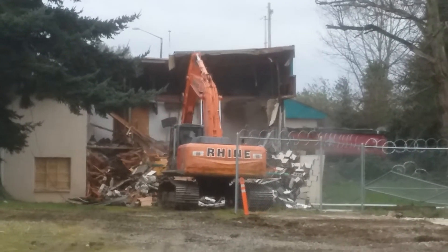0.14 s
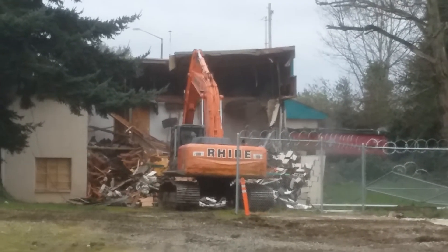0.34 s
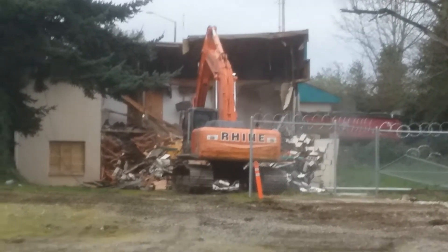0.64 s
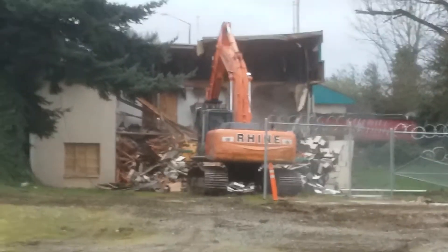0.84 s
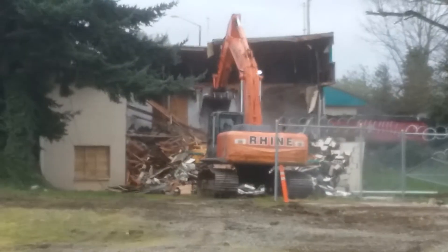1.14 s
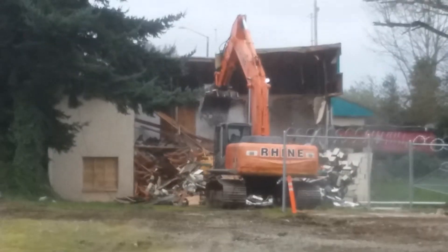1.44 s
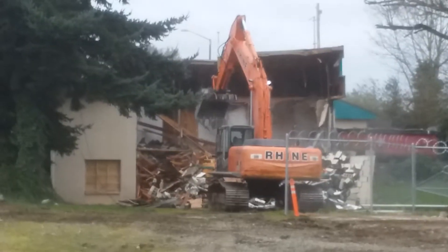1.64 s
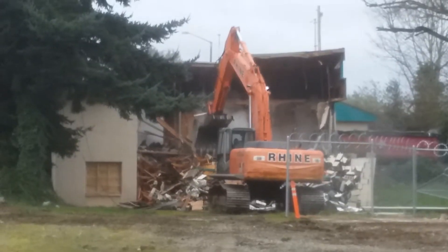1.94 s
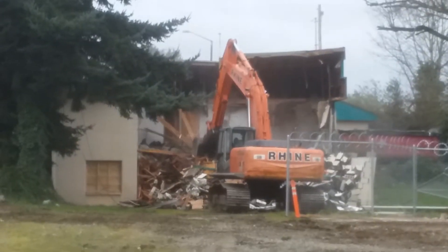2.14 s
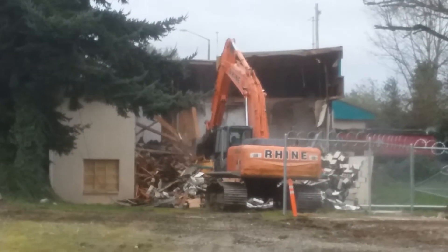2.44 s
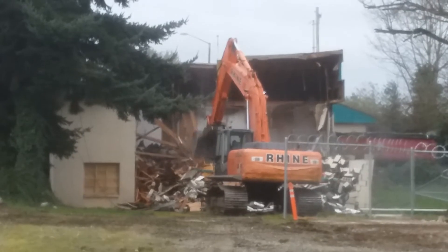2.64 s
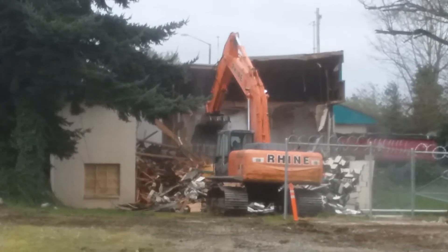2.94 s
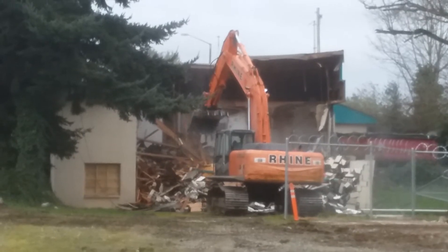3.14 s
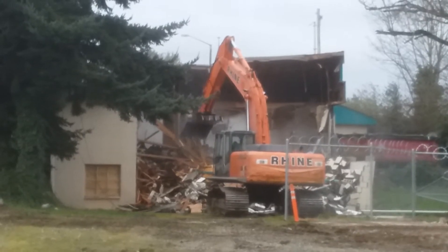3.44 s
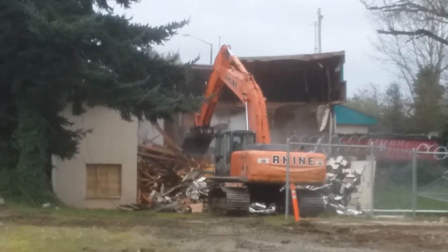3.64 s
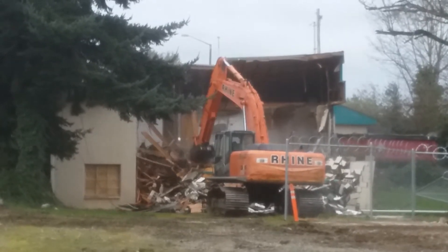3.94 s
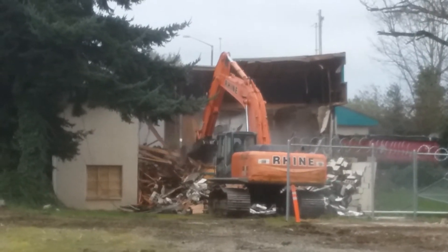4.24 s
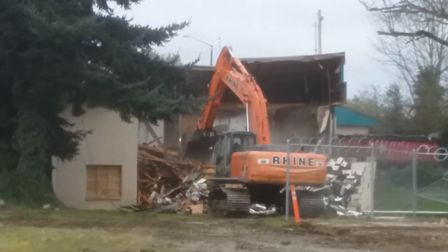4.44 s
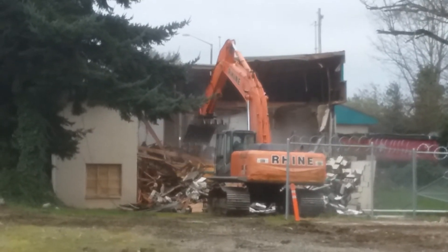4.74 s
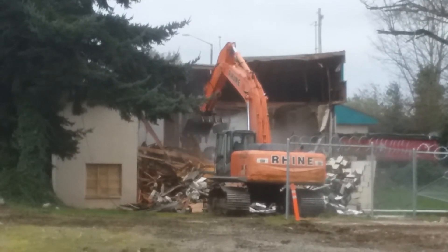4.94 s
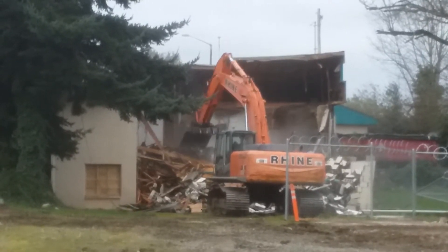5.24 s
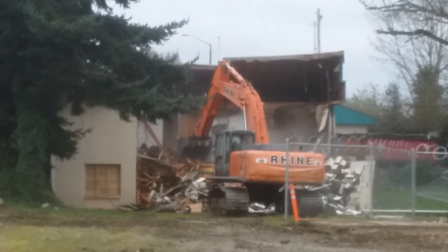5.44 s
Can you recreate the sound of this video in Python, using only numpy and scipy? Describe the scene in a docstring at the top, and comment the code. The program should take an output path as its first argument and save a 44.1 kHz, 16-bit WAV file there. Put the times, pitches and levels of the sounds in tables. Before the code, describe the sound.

Outdoors, some way off, a diesel excavator drones steadily as it tears into a timber building. A crackle of breaking boards opens, then a lull; the engine gains a hydraulic roar from about one second. Dense cracking and splintering peaks just after two seconds, eases near three, then returns in crunching waves with dull thuds and ground rumble to the end. A few tiny dry ticks sound close to the microphone.

```python
"""A diesel excavator some way off tears into a timber building; its engine drones as summed shaft orders throughout.
Surges of crushed boards, splits and splinters, made of short rings, impulses and noise, come from the start
with cracks (noise bursts), ground rumble and trickling rubble; the yard answers with decaying noise echoes.
A few ticks (filtered noise) sound close by from 0.7 s; the hydraulics add a roar of noise from 1 s.
Later come swells of thin hiss and scraping (narrow noise bands) and dull thuds (decaying sines)."""
import sys
import numpy as np
from scipy import signal
from scipy.fft import rfft, irfft, next_fast_len
from scipy.io import wavfile
from scipy.ndimage import map_coordinates

SR = 44100
rng = np.random.default_rng(int(sys.argv[2]) if len(sys.argv) > 2 else 0)


def log_audio(samples):
    """Write samples as a 16-bit WAV file to the path given in sys.argv[1]."""
    # one column per channel
    frames = np.atleast_2d(samples).T
    # limit to full scale, then quantise
    limited = np.clip(frames, -1, 1)
    pcm = np.round(limited * 32767).astype(np.int16)
    wavfile.write(sys.argv[1], SR, pcm)


N = 246959  # samples

# engine load: (time [s], drone level [dB])
LOAD = [(0, -30), (.5, -34.5), (1.04, -34.5), (1.14, -27.5), (1.45, -26.5), (1.9, -23.5), (2.8, -28.5),
        (3.3, -29), (3.7, -24), (4.3, -26.5), (4.7, -23), (5.05, -26.5), (5.6, -26)]
# spectrum of splinters and sharp crack edges: (frequency [Hz], level [dB])
SPLINTER_SPECTRUM = [(1800, -43), (3200, 2), (4500, 0), (5800, -4), (6800, -9.5), (7500, -9), (8600, -25.5),
                     (12000, -25), (15500, -32)]


def amp(db):
    """Decibels to gain."""
    return 10 ** (np.asarray(db) / 20)


def unit(x):
    """Scale to rms 1."""
    return x / np.sqrt(np.mean(x ** 2) + 1e-20)


def along(points, hz):
    """Interpolate (Hz, value) points on a log frequency axis."""
    f, v = np.transpose(points)
    return np.interp(np.log(hz + 1), np.log(f + 1), v)


def curves(rows):
    """One value per sample for each column after the time."""
    s, *cols = np.transpose(rows)
    return [np.interp(np.arange(N) / SR, s, c) for c in cols]


def wobble(rate_hz):
    """Smooth random curve with rate_hz knots a second."""
    return map_coordinates(rng.standard_normal(2048), [np.arange(N) * rate_hz / SR], mode="wrap")


def colour(x, spectrum):
    """Causal minimum-phase filter with the given spectrum, by folding its cepstrum."""
    size = 2 * next_fast_len(len(x) // 2 + 2048)
    gain = amp(along(spectrum, np.fft.rfftfreq(size, 1 / SR)))
    cepstrum = irfft(np.log(gain))
    cepstrum[1:size // 2] *= 2
    cepstrum[size // 2 + 1:] = 0
    return irfft(rfft(x, size) * np.exp(rfft(cepstrum)))[:len(x)]


def add(track, s, sound):
    """Mix a sound into a track at time s."""
    part = track[max(round(s * SR), 0):][:len(sound)]
    part += sound[:len(part)]


def fractures(rate_hz, spread_db, dust):
    """Random one-sample impulses of uneven size over a share of noise dust."""
    happens = rng.random(N) < rate_hz / SR
    sizes = amp(spread_db * np.clip(rng.standard_normal(N), -2, 2))
    signs = rng.choice([-1, 1], N)
    return unit(happens * sizes * signs) + dust * rng.standard_normal(N)


def knocks(low_hz, high_hz, cycles, spread_db, count):
    """Many pieces of wood, each ringing briefly at its own pitch; the decay constant is in cycles."""
    when, pitch, weight, phase = rng.random((count, 4)).T[:, :, None]
    hz = low_hz * (high_hz / low_hz) ** pitch
    n = np.arange(1024)
    decay = np.exp(-n / SR * hz / cycles)
    rings = amp(spread_db * weight) * decay * np.sin(2 * np.pi * (hz * n / SR + phase))
    places = (when * N).astype(int) + n
    return unit(np.bincount(places.ravel(), rings.ravel(), N)[:N])


def engine(flutter_db=1.96, waver_rad=0.13, throb=0.081):
    """Shaft orders through the exhaust, a steady fan, and a hydraulic load roar throbbing at the firing rate."""
    # shaft speed: (time [s], speed [Hz])
    shaft = [(0, 35.27), (1.2, 35.37), (1.6, 35.04), (3.3, 34.91), (5.6, 34.87)]
    # exhaust and fan tones: (multiple of shaft speed, level [dB])
    orders = [(2, -11), (3, -12.5), (4, -9.5), (5, 0), (6, -6.5), (7, -15.5), (8, -21.5), (10, -23.5),
              (11, -26), (17, -29)]
    # spectrum of the fan: (frequency [Hz], level [dB])
    fan_spectrum = [(150, -29), (260, 0.5), (390, -4.5), (520, 3), (950, -2), (1200, -5.5), (1900, 0.5),
                    (2400, -6.5), (3300, -5), (4200, -22.5), (5700, -21.5), (6500, -26), (7050, -16.5),
                    (8500, -41.5), (15500, -46.5)]
    # spectrum of the load roar: (frequency [Hz], level [dB])
    roar_spectrum = [(150, -18), (250, -14.5), (347, -6), (583, -0.5), (809, -1.5), (1410, -4.5),
                     (2200, -11), (2400, -10), (2660, -13), (5500, -25), (7510, -34), (8770, -70),
                     (15500, -57)]
    fan_db = -39
    roar_over_drone_db, roar_db_per_load_db = -4.5, 0.47
    work_start_s, work_rise_s = 0.99, 0.41

    (shaft_hz,), (load_db,) = curves(shaft), curves(LOAD)
    angle = 2 * np.pi * np.cumsum(shaft_hz) / SR
    tones = np.zeros(N)
    for order, db in orders:
        level = amp(db + flutter_db * wobble(20))
        phase = waver_rad * wobble(14) + 2 * np.pi * rng.random()
        tones += level * np.sin(round(order) * angle + phase)
    drone = np.sqrt(2) * amp(load_db) * tones

    fan = amp(fan_db) * unit(colour(rng.standard_normal(N), fan_spectrum))

    firing = 1 + throb * np.cos(2 * angle)  # two firings per turn
    roar = unit(colour(rng.standard_normal(N) * firing, roar_spectrum))
    working = np.clip((np.arange(N) / SR - work_start_s) / work_rise_s, 0, 1)
    mean_db = load_db.mean()
    roar_db = roar_over_drone_db + mean_db + roar_db_per_load_db * (load_db - mean_db)
    return drone + fan + working * amp(roar_db) * roar


def surges(layer, lag_s=0, fall_share=1):
    """Power-summed strength of all timber surges, each rising, holding and dying away, for one layer."""
    # timber crushed by the bucket or sliding off the pile; last three levels are over splitting:
    # (full at [s], rise [s], hold [s], fall [s], splitting [dB], boards [dB], splinters [dB], rumble [dB])
    surge_rows = [(0.0, .05, 0.0067, 0.11, -13.5, -4.5, -7.5, -9),
                  (0.41, 0.033, .03, 0.19, -34, 2.5, -19, 0), (1.283, 0.24, 0.059, 0.23, -33, -6, -11, -12),
                  (1.724, 0.013, .06, 0.041, -18.5, 0, -30, -5),
                  (2.016, .012, 0.036, 0.061, -19.5, -0.5, -15, -5.5),
                  (2.088, 0.026, 0.072, 0.087, -12, -7.5, -7, -22),
                  (2.24, 0.055, 0.061, 0.12, -16, -1, -10, -9.5),
                  (2.502, 0.024, 0.12, 0.31, -27.5, 0.5, -22, -7.5),
                  (3.456, 0.14, .08, 0.16, -36, 3.5, -29, -2),
                  (3.688, 0.19, 0.12, 0.063, -17.5, 0, -19.5, -4),
                  (3.848, 0.06, 0.13, 0.12, -14, -3, -6.5, -12.5),
                  (4.047, 0.032, 0.017, 0.11, -17, -2.5, -10, -2.5),
                  (4.286, 0.11, 0.26, 0.41, -30, 3.5, -13.5, 3),
                  (5.191, 0.1, 0.017, 0.11, -17.5, -2, -29, -1.5),
                  (5.391, 0.11, 0.12, 0.13, -18, -1.5, -17.5, 1),
                  (5.536, 0.073, 0.045, .1, -20.5, -2, -7, 4.5)]
    t, power = np.arange(N) / SR - lag_s, np.zeros(N)
    for s, rise, hold, fall, db, boards_db, splinters_db, rumble_db in surge_rows:
        over_db = {"splitting": 0, "boards": boards_db, "splinters": splinters_db, "rumble": rumble_db}[layer]
        rising = np.minimum(t - s, 0) / rise
        falling = np.maximum(t - s - hold, 0) / (fall * fall_share)
        power += (amp(db + over_db) * np.exp(rising - falling)) ** 2
    return np.sqrt(power)


def rumble(ground_over_drone_db=-0.5, wreck_db=1):
    """Low noise: the machine rumbles with its load, the wreck with every heavy surge."""
    # spectrum of the rumble: (frequency [Hz], level [dB])
    rumble_spectrum = [(20, -55), (38, -33), (52, -16), (66, -9.5), (90, -6), (120, -2), (160, 0),
                       (220, -3.5), (300, -17), (450, -25), (900, -75.5)]
    load_db, = curves(LOAD)
    heave = np.hypot(amp(load_db + ground_over_drone_db), amp(wreck_db) * surges("rumble"))
    return heave * unit(colour(rng.standard_normal(N), rumble_spectrum))


def crush(boards_db=-3.0, splits_db=-2.5, tearing_db=5, splinters_db=-2, clump_db=0.94):
    """Boards tumble and split in clumps; a hard bite also tears the fibres and throws splinters."""
    # spectrum of tumbling boards: (frequency [Hz], level [dB])
    board_spectrum = [(150, -18.5), (270, -3.5), (410, -9.5), (560, 4.5), (750, 3), (980, 4), (1200, -5.5),
                      (2500, -46.5)]
    # spectrum of splitting wood: (frequency [Hz], level [dB])
    split_spectrum = [(500, -20), (900, -5), (1100, -5.5), (1330, -3), (1580, -3.5), (1820, -3.5),
                      (2300, -8.5), (2750, -15.5), (3800, -22.5), (7000, -61.5)]
    # spectrum of tearing fibres: (frequency [Hz], level [dB])
    tearing_spectrum = [(900, -37), (1350, -11), (1600, -10.5), (1900, 1), (2350, 0.5), (2650, -5.5),
                        (2850, -5.5), (3400, -22.5), (6000, -51.5)]
    # rubble that never stops trickling: (boards [dB], splitting [dB], splinters [dB])
    trickle_db = -42.5, -41.5, -54

    clumps = amp(clump_db * wobble(60))
    # boards land a moment after they break
    tumbling = np.hypot(surges("boards", lag_s=0.0079), amp(trickle_db[0]))
    splitting = np.hypot(surges("splitting"), amp(trickle_db[1]))
    bite = surges("splinters", fall_share=0.86)
    throwing = np.hypot(bite, amp(trickle_db[2]))

    boards = colour(knocks(247.0, 1300, cycles=2.47, spread_db=9, count=2800), board_spectrum)
    split_rings = knocks(905, 3178, cycles=6.0, spread_db=1.5, count=2400)
    splits = colour(fractures(1100, spread_db=2, dust=0.55) + 0.3 * split_rings, split_spectrum)
    tearing = colour(fractures(800, spread_db=3.0, dust=0.24), tearing_spectrum)
    splinters = colour(fractures(1200, spread_db=-0.5, dust=0.92), SPLINTER_SPECTRUM)
    return clumps * (amp(boards_db) * tumbling * unit(boards)
                     + amp(splits_db) * splitting * unit(splits)
                     + amp(tearing_db) * bite * unit(tearing)
                     + amp(splinters_db) * throwing * unit(splinters))


def cracks(body_db=-10, edge_db=-7, body_t60_s=0.11, edge_t60_s=0.086, attack_s=0.00066):
    """A board gives way in a short burst of fibre breaks: a woody body and a sharp edge."""
    # single boards breaking: (time [s], level [dB], sharp edge [dB])
    crack_rows = [(.004, -5, -24.5), (0.02, -9, -3), (0.043, -8, -13.5), (.124, -13, -26), (.168, -17, -14),
                  (1.602, -13, -18), (1.727, -3.5, -40), (1.746, -6.5, -35.5), (2.004, -5.5, -14.5),
                  (2.013, -0.5, -38), (2.04, -0.5, -29), (2.071, 0, -7), (2.119, -4, -0.5), (2.168, -5, -1),
                  (2.176, -3, -4), (2.203, 4, -9), (2.244, -2.5, -7), (2.29, 0, -22), (2.474, -5.5, -27),
                  (2.522, -9.5, -27), (3.111, -14.5, -36), (3.334, -15.5, -25), (3.675, -6, -19.5),
                  (3.826, -9, -4.5), (3.843, -12, -6), (3.928, -3, -13), (4.053, -3, -21),
                  (4.444, -10.5, -33), (4.569, -15.5, -11.5), (5.188, -10, -29), (5.426, 0.5, -21),
                  (5.498, -1, -36), (5.547, -1, -11)]
    # spectrum of the woody body: (frequency [Hz], level [dB])
    body_spectrum = [(150, -22), (400, -15.5), (700, -3.5), (1300, 4.5), (1900, 6), (2700, -7), (5000, -38),
                     (8000, -56), (12000, -87.5)]
    out, t = np.zeros(N), np.arange(SR // 5) / SR
    for s, db, sharp_db in crack_rows:
        fibres = rng.standard_normal((2, len(t))) * amp(1.43 * rng.standard_normal((2, len(t))))
        body = unit(colour(fibres[0], body_spectrum)) * amp(body_db - 60 * t / body_t60_s)
        edge = unit(colour(fibres[1], SPLINTER_SPECTRUM)) * amp(edge_db + sharp_db - 60 * t / edge_t60_s)
        add(out, s, amp(db) * (1 - np.exp(-t / attack_s)) * (body + edge))
    return out


def bucket(x):
    """The breaking wood plus the steel bucket's ring: parallel resonant band-passes."""
    # bucket modes: (frequency [Hz], width [Hz], level [dB])
    modes = [(617, 26, -6), (1426, 79, -5.5), (1847, 184, -12)]
    size = next_fast_len(N + 8192)
    f = np.fft.rfftfreq(size, 1 / SR)
    ring = 0
    for hz, width, db in modes:
        damping = 1j * f * width
        ring = ring + amp(db) * damping / (hz * hz - f * f + damping)
    return irfft(rfft(x, size) * (1 + ring), size)[:N]


def yard(x):
    """Scatter from walls and trees: two independent noise tails, the treble dying fastest."""
    # reverberation: (frequency [Hz], t60 [s])
    decay_times = [(200, 0.96), (1500, 0.51), (8000, 0.15)]
    hz, t, z = signal.stft(rng.standard_normal((2, SR // 2)), SR, nperseg=256)
    decay = amp(-60 * t / along(decay_times, hz)[:, None])
    tail = signal.istft(z * decay, SR, nperseg=256)[1]
    return signal.fftconvolve(x[None], tail / np.linalg.norm(tail[0]), axes=1)[:, :N]


def ticks(t60_s=0.0046):
    """Dry, thin ticks next to the microphone: fast-decaying filtered noise."""
    # ticks: (time [s], peak level [dB])
    tick_rows = [(0.7124, -36), (1.028, -33), (1.0333, -22), (1.1897, -31), (1.367, -24.5)]
    # spectrum of a tick: (frequency [Hz], level [dB])
    tick_spectrum = [(1500, -20), (4200, 1), (7200, 3.5), (9000, -8), (15000, -20.5)]
    out, t = np.zeros(N), np.arange(SR // 40) / SR
    for s, db in tick_rows:
        tick = colour(rng.standard_normal(len(t)) * amp(-60 * t / t60_s), tick_spectrum)
        add(out, s, amp(db) * tick / np.abs(tick).max())
    return out


def scrapes():
    """Brief swells of thin hiss and scraping: noise with a Gaussian band and envelope."""
    # swells; width, rise and fall are Gaussian sigmas:
    # (peak time [s], level [dB], centre [Hz], width [Hz], rise [s], fall [s])
    scrape_rows = [(1.75, -63, 13900, 2200, .18, 0.085), (1.85, -48.5, 12200, 2000, 0.035, 0.042),
                   (2.96, -66, 14000, 1800, .012, .035), (2.963, -40.5, 4470, 350, 0.0098, 0.018),
                   (2.99, -41, 3350, 200, 0.0087, 0.015)]
    size = next_fast_len(N)
    out, t, hz = np.zeros(N), np.arange(N) / SR, np.fft.rfftfreq(size, 1 / SR)
    for s, db, centre_hz, width_hz, rise, fall in scrape_rows:
        band_gain = np.exp(-((hz - centre_hz) / width_hz) ** 2 / 2)
        band = irfft(rfft(rng.standard_normal(size)) * band_gain, size)[:N]
        swell = np.exp(-((t - s) / np.where(t < s, rise, fall)) ** 2 / 2)
        out += amp(db) * swell * unit(band)
    return out


def thuds(attack_s=.004):
    """Beams land softly and ring as decaying sines."""
    # heavy pieces landing: (time [s], level [dB], pitch [Hz], t60 [s])
    thud_rows = [(1.808, -14.5, 635, 0.13), (1.826, -8.5, 151, 0.26), (2.046, -1, 174, 0.078),
                 (2.238, -12, 620, 0.11), (2.335, -6.5, 638, 0.097), (2.562, -10, 180, 0.11),
                 (3.512, -7.5, 870, 0.051), (3.626, -0.5, 167, 0.062), (4.535, -14, 178, 0.25),
                 (4.659, -12, 185, 0.18), (5.146, -11, 162, 0.11), (5.464, 3, 139.3, 0.12)]
    out, t = np.zeros(N), np.arange(SR // 3) / SR
    for s, db, hz, t60 in thud_rows:
        envelope = amp(db - 60 * t / t60) * (1 - np.exp(-t / attack_s))
        add(out, s, envelope * np.sin(2 * np.pi * hz * t))
    return out


def scene():
    """The far work is nearly mono; the wreck leans a little right and its echo spreads the middle range."""
    machine = engine()
    wreck = amp(-1.1) * bucket(crush() + cracks())
    echo, spread = yard(wreck)
    mid = machine + rumble() + wreck + amp(-11.5) * echo + ticks() + scrapes() + thuds()

    # side spectra: (frequency [Hz], level [dB])
    lean = colour(wreck, [(150, -52), (700, -27), (1300, -22), (2200, -21), (3500, -34)])
    wide_echo = colour(spread, [(150, -43), (550, -28.5), (1100, -16.5),
                                (2000, -21.5), (4000, -13.5), (8000, -17.5)])
    air = amp(-24) * yard(machine)[0]  # the engine's echo off the trees
    wide_air = colour(air, [(180, -30), (600, 4.5), (8000, 10)])
    side = wide_echo + wide_air - lean
    return np.array([mid + side, mid - side])


def record(dry):
    """The recorder rounds off the highest peaks and keeps nothing above its band limit."""
    top_hz = 15750
    held = dry / (1 + np.abs(dry) ** 6) ** (1 / 6)
    size = next_fast_len(N + 8192)
    passed = np.fft.rfftfreq(size, 1 / SR) < top_hz
    return irfft(rfft(held, size) * passed, size)[:, :N]


dry = scene()
out = record(dry)
log_audio(out)
```